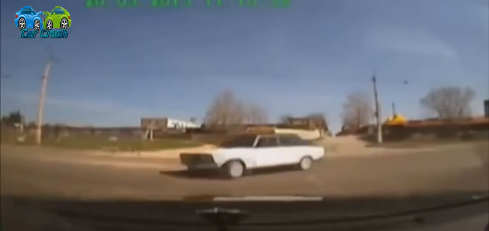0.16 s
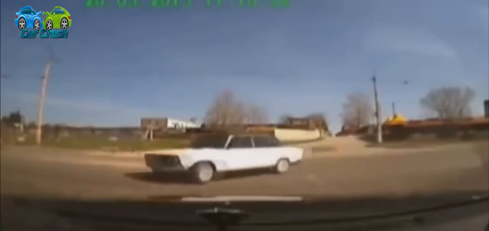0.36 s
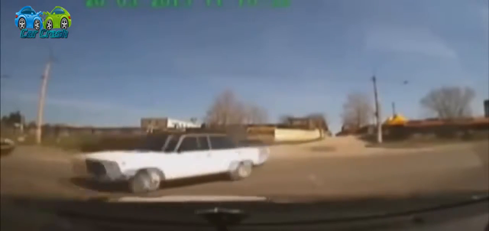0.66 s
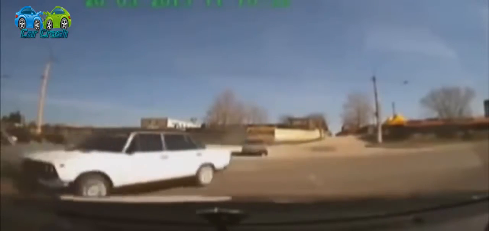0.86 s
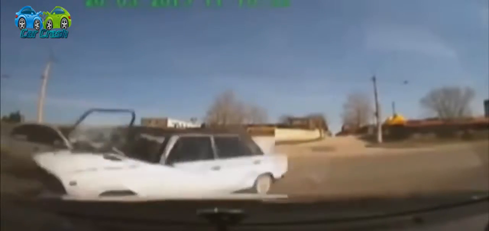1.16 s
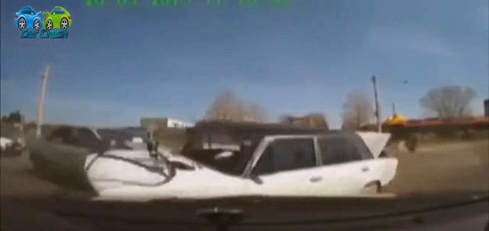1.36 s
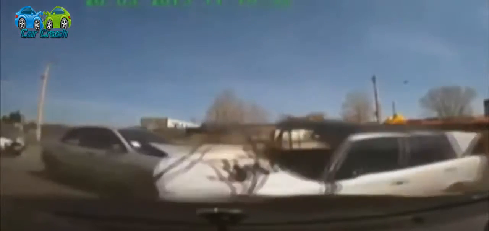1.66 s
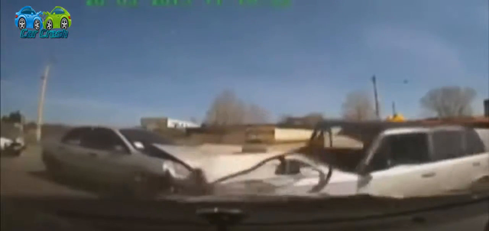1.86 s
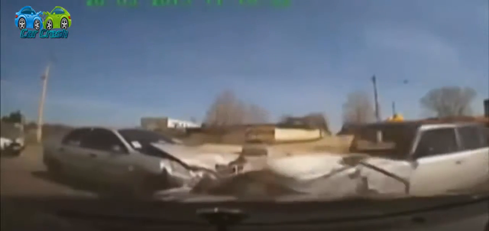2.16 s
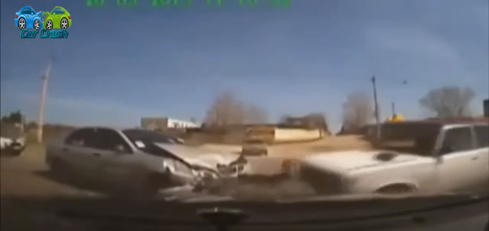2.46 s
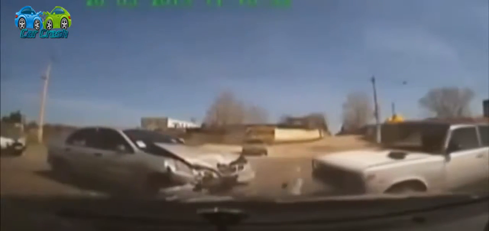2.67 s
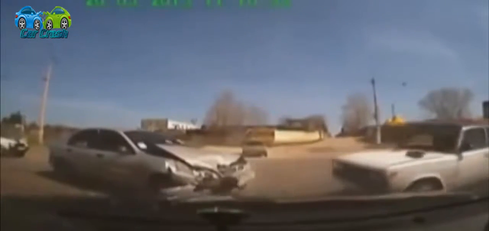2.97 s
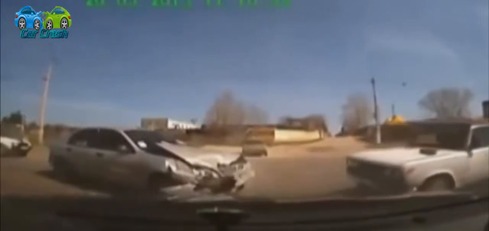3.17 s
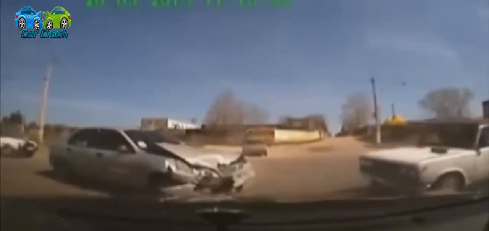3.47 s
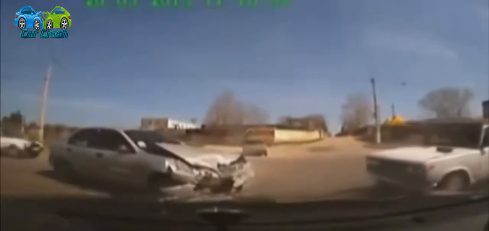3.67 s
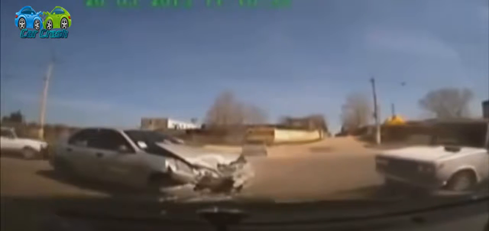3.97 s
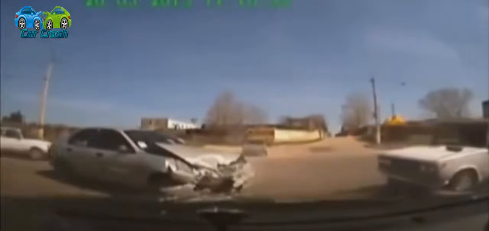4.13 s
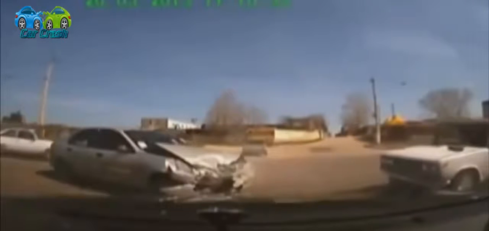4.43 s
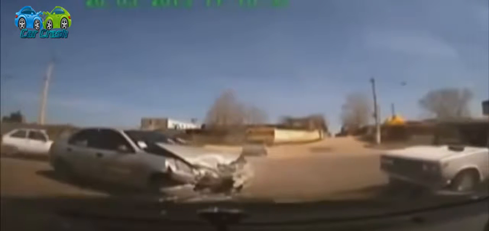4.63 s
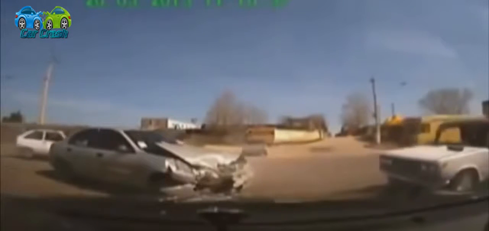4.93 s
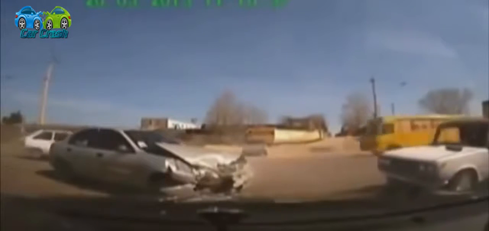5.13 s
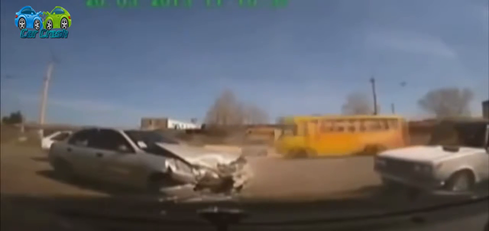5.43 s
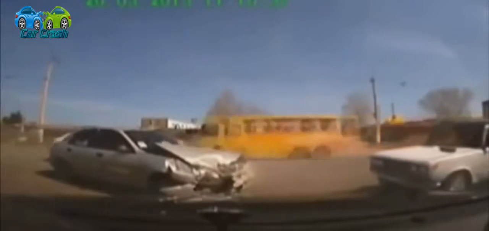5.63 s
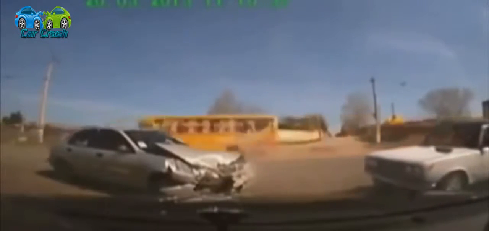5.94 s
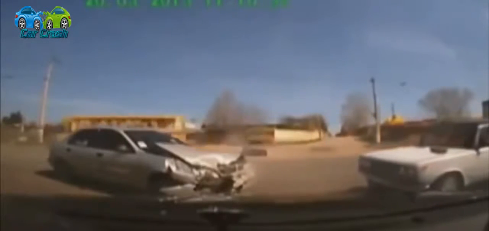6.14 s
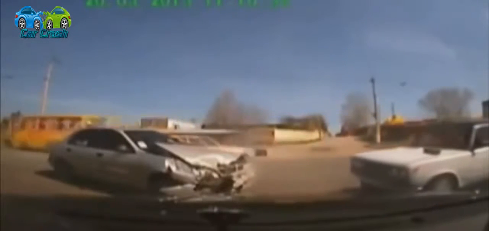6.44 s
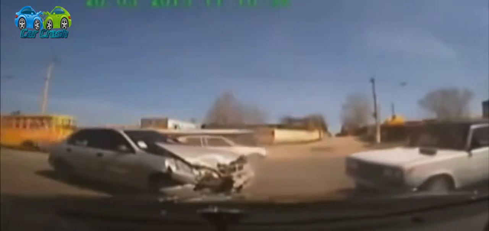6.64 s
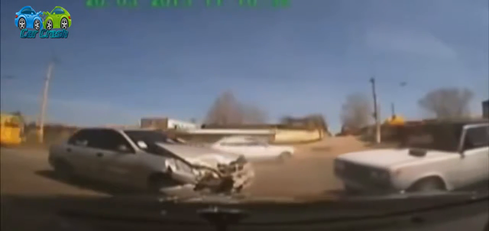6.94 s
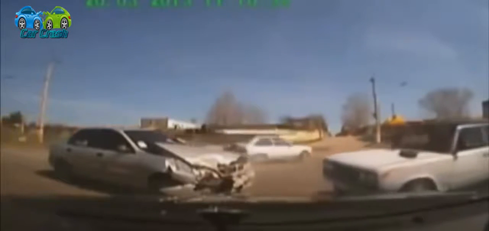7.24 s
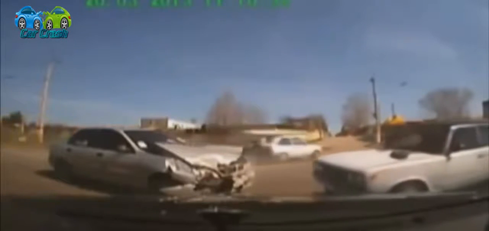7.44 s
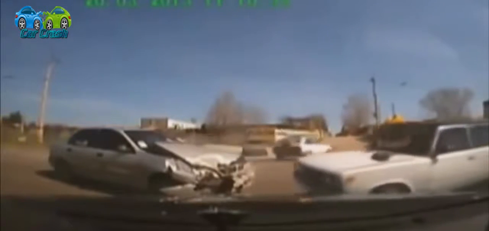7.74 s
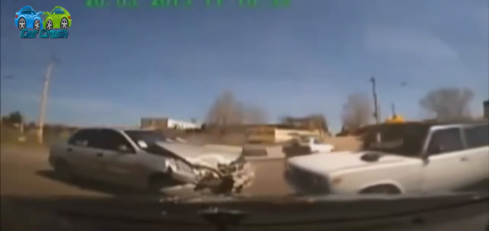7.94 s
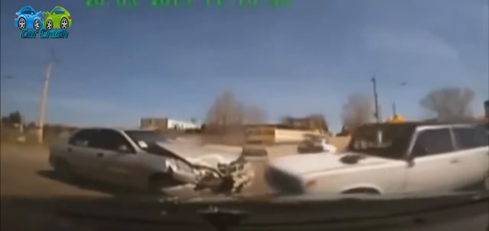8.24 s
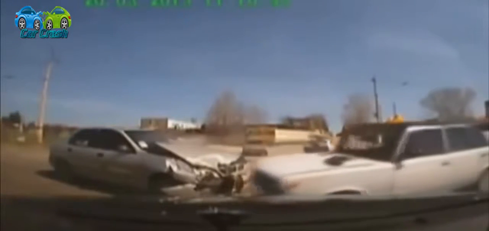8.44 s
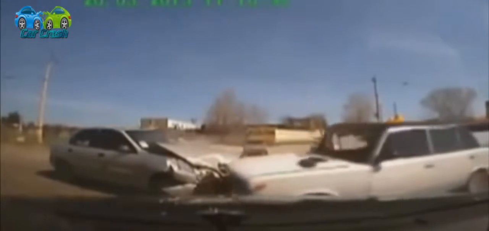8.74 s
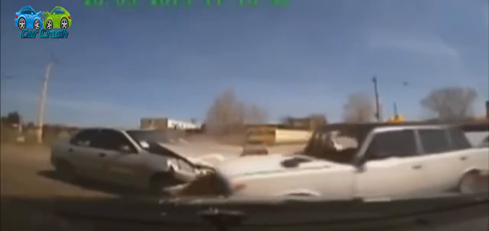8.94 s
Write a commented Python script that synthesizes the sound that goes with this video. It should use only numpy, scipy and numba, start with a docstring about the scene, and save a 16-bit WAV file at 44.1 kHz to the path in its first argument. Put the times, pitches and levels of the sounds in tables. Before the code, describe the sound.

Muffled in-car sound: rising engine, brief tyre screech, heavy metal crash with scraping and secondary thuds, then a rough rattling engine and wavering hum.

```python
"""An engine pulls away over road roar, tyres squeal and two cars collide and bounce at a crossing.
Blows and falling parts knock and snap, metal scrapes, then a damaged engine races on over a wandering low hum,
with short groans and a swelling drone. Engines and tones are stacked sines; road, panels and knocks are noise
shaped by spectra and resonances. The cheap microphone in the car is dull, sits off centre and overloads;
its sample clock wobbles."""
import sys
import numpy as np
from scipy import signal
from scipy.fft import rfft, irfft
from scipy.io import wavfile
from scipy.ndimage import uniform_filter1d
from numba import njit

SR = 44100
rng = np.random.default_rng(int(sys.argv[2]) if len(sys.argv) > 2 else 0)


def digitize_waveform(pressure):
    """Quantize a signal to 16-bit integers and store it at the path in sys.argv[1].

    Rows of a 2-D input are taken as channels; values are limited to [-1, 1].
    """
    field = np.atleast_2d(pressure).T
    bounded = np.clip(field, -1, 1)
    quanta = np.round(bounded * 32767).astype(np.int16)
    wavfile.write(sys.argv[1], SR, quanta)


N = 401310
TIME = np.arange(N) / SR


def undb(db):
    """Decibels to amplitude."""
    return 10 ** (np.asarray(db) / 20)


def unit(x):
    """Scale to rms 1."""
    return x / np.sqrt(np.mean(x ** 2))


def gate_between(start_s, end_s, fade_s):
    """1 from start to end, fading to 0 outside."""
    return np.clip(np.minimum(TIME - start_s, end_s - TIME) / fade_s + 1, 0, 1)


def read(table, fade_s=0.017):
    """A gate that closes outside the curve, then its columns at every sample."""
    s, *columns = np.transpose(table)
    return [gate_between(s[0], s[-1], fade_s)] + [np.interp(TIME, s, c) for c in columns]


@njit
def svf(x, hz, width):
    """State-variable band-pass with a moving centre, gain 1 there."""
    y, b, l = np.empty(len(x)), 0., 0.
    for i in range(len(x)):
        g, k = np.tan(np.pi * hz[i] / SR), width / hz[i]
        v = (b + g * (x[i] - l)) / (1 + g * (g + k))
        b, l, y[i] = 2 * v - b, l + 2 * g * v, k * v
    return y


def band(x, hz, width):
    """Band-pass with a fixed or moving centre."""
    return svf(x, hz + np.zeros(len(x)), 1. * width)


def double_band(x, hz, width, second_width):
    """Two band-passes in a row on one centre, for steeper skirts."""
    return band(band(x, hz, width), hz, second_width)


def walk(rate):
    """Random levels held 1 / rate s and slewed twice; spread near 1."""
    k = int(SR / rate)
    steps = np.repeat(rng.standard_normal(N // k + 1), k)
    return 1.261 * uniform_filter1d(uniform_filter1d(steps, k), k)[:N]


def colour(x, spectrum):
    """Shape x by (f/Hz, level/dB) points and scale to rms 1."""
    hz, db = np.transpose(spectrum)
    bins = np.arange(1, N // 2 + 2) * SR / N
    gain = undb(np.interp(np.log(bins), np.log(hz), db))
    return unit(irfft(rfft(x) * gain, N))


def tone(hz, multiple=1):
    """Sine of rms 1 on a moving pitch."""
    return np.sqrt(2) * np.sin(2 * np.pi * multiple * np.cumsum(hz) / SR)


def noisy_modes(modes, flutter_db):
    """Noise in each resonance, fluttering on its own."""
    out = 0
    for f, w, db in modes:
        ring = unit(double_band(rng.standard_normal(N), f, w, 2 * w))
        out = out + undb(db + flutter_db * walk(5)) * ring
    return out


def hum(phrases, flutter_db):
    """A near-pure tone that follows each phrase."""
    out = 0
    for phrase in phrases:
        gate, hz, db = read(phrase, fade_s=0.0085)
        out = out + gate * undb(db + flutter_db * walk(25)) * tone(hz)
    return out


def friction(curve, width_hz, waver, blur_db, overtone_db):
    """Stick-slip: a wavering tone that breaks up, blurred by noise in the same resonance and in its overtones."""
    gate, hz, db = read(curve)
    noise = rng.standard_normal(N)
    pitch = hz * (1 + waver * walk(60))
    cry = undb(0.8 * walk(70)) * tone(pitch)
    blur = double_band(noise, hz, width_hz, width_hz)
    overtones = sum(unit(band(noise, k * hz, k * width_hz)) + tone(pitch, multiple=k) for k in (2, 3))
    mix = unit(cry) + undb(blur_db) * unit(blur) + undb(overtone_db) * unit(overtones)
    return gate * undb(db) * unit(mix)


# resonances the higher orders climb through: (f/Hz, width/Hz, gain as level/dB)
PULL_RESONANCES = [(405, 100, -48), (541, 47, -49), (850, 99, -46.5)]
PULL_START_HZ, PULL_CLIMB_HZ_PER_S = 61.95, 35  # firing rate
PULL_LIFT_S = 1.2  # the driver lifts off
FIRST_OVER_SECOND_DB = -1
SECOND_START_DB, SECOND_GAIN_DB_PER_S = -58.5, 19.5  # second order grows with the revs
# third order grows, then drops away
THIRD_START_DB, THIRD_GAIN_DB_PER_S, THIRD_ENDS_S, THIRD_LATE_DB = -50, 9.5, 0.79, -50.5


def pulling_engine():
    """Three strong low orders of the firing rate, and higher ones that flutter and light up in the resonances."""
    hz = PULL_START_HZ + PULL_CLIMB_HZ_PER_S * np.minimum(TIME, PULL_LIFT_S + .2)
    second_db = SECOND_START_DB + SECOND_GAIN_DB_PER_S * np.minimum(TIME, PULL_LIFT_S)
    third_db = np.where(TIME < THIRD_ENDS_S, THIRD_START_DB + THIRD_GAIN_DB_PER_S * TIME, THIRD_LATE_DB)
    first = undb(FIRST_OVER_SECOND_DB + 2.0 * walk(5.7)) * tone(hz)
    low = undb(second_db) * (tone(hz, multiple=2) + first)
    third = uniform_filter1d(undb(third_db), size=2000) * tone(hz, multiple=3)
    stack = sum(undb(4.8 * walk(5.8)) * tone(hz, multiple=k) for k in range(4, 11))
    upper = sum(undb(db) * double_band(stack, f, w, 2 * w) for f, w, db in PULL_RESONANCES)
    upper = np.minimum(TIME / 0.93, 1) * upper  # fades in
    return gate_between(0, PULL_LIFT_S, fade_s=0.096) * (low + third + upper)


# swell of road and traffic: (t/s, gain as level/dB)
TRAFFIC_SWELL = [(0, -47), (1.04, -41), (1.9, -42.5), (2.3, -28), (3.4, -37.5), (9.1, -39.5)]
# tyre roar spectrum: (f/Hz, relative level/dB per Hz)
ROAR_SPECTRUM = [(120, -16.5), (250, -10.5), (400, -13.5), (600, -14.5), (1000, -13.5), (1200, -9.5),
                 (2000, -18.5), (4060, -32.5), (6000, -52)]
# cabin modes the road excites: (f/Hz, width/Hz, level/dB over the traffic swell)
CABIN_MODES = [(235, 33, -14), (511.5, 18.5, -8.5), (810, 55, -7.5)]
# the own car shakes at idle: (f/Hz, width/Hz, level/dB)
IDLE_MODES = [(27, 12.7, -42.5), (70.4, 67, -48.5), (138, 27.5, -41.5)]
HISS_DB = -72  # self noise of the microphone


def road():
    """Tyre roar and cabin modes swell with the traffic, over idle shake and hiss: all shaped noise."""
    swell_db = read(TRAFFIC_SWELL)[1]
    roar = undb(5 + 0.25 * walk(6.9)) * colour(rng.standard_normal(N), ROAR_SPECTRUM)
    cabin = undb(swell_db) * (roar + noisy_modes(CABIN_MODES, flutter_db=3.5))
    hiss = undb(HISS_DB) * rng.standard_normal(N)
    return cabin + noisy_modes(IDLE_MODES, flutter_db=2.0) + hiss


# steady hum before the crash: (t/s, f/Hz, level/dB)
HUM_BEFORE = [(1.55, 145, -38), (2.36, 140.7, -49)]
# the hum surges and sags afterwards: (t/s, f/Hz, level/dB)
HUM_SURGE = [(3.36, 98.6, -39), (3.42, 112.9, -24.5), (3.66, 167.2, -24.5), (3.85, 159.5, -35),
             (4.13, 136.3, -29), (4.36, 149.4, -22), (4.55, 142.1, -32), (4.62, 173.3, -31),
             (5.06, 142.4, -23), (5.27, 148.5, -20), (5.51, 163.3, -27), (5.78, 125, -40),
             (6.06, 139.7, -35), (6.15, 122.4, -25), (6.31, 151, -26), (6.6, 129, -37), (6.741, 113.6, -32),
             (6.95, 139.7, -28.5), (7.549, 116.7, -45.5), (7.671, 122.2, -35.5), (8.48, 147.9, -26),
             (8.682, 153, -35.5), (8.999, 158, -43)]


def low_hum():
    """A near-pure sine, steady at first, then wandering in pitch and level."""
    return hum([HUM_BEFORE, HUM_SURGE], flutter_db=0.06)


# first sliding tyre: (t/s, f/Hz, level/dB)
TYRE_LOW = [(1.9, 731, -41), (1.99, 688, -15.5), (2.12, 689, -16), (2.28, 747, -20.5), (2.37, 739, -13.5),
            (2.41, 740, -23)]
# second sliding tyre: (t/s, f/Hz, level/dB)
TYRE_HIGH = [(1.92, 802, -41), (1.956, 770, -30.5), (2.334, 794, -13), (2.41, 798, -32)]


def squealing_tyres():
    """Rubber sticks and slips: one tyre cries a clear note, the other is mostly noise around its pitch."""
    low = friction(TYRE_LOW, width_hz=110, waver=.025, blur_db=-3, overtone_db=-8)
    return low + friction(TYRE_HIGH, width_hz=220, waver=0.02, blur_db=33, overtone_db=-16)


def blow(s, push_s, db, t60_s):
    """Quick rise, hold while the bodies push, then ring out."""
    rise = np.clip((TIME - s) / 0.009, 0, 1)
    return rise * undb(db - 60 * np.maximum(TIME - s - push_s, 0) / t60_s)


# bodies hit each other and the road: (t/s, push length/s, crunch level/dB before SHEET_GAIN_DB, thud gain as level/dB)
IMPACTS = [(2.384, 0.12, -14, -19), (2.523, 0.053, -32, -32), (3.162, 0.025, -28, -24.5),
           (3.284, 0.055, -25, -32), (3.421, 0.026, -44, -28), (3.744, 0.039, -28, -26.5),
           (3.914, 0.036, -48, -29), (4.047, 0.026, -16.5, -16), (4.09, 0.056, -37.5, -25),
           (4.625, 0.049, -35.5, -36)]
# sheet metal spectrum: (f/Hz, relative level/dB per Hz)
SHEET_SPECTRUM = [(88, -17.5), (150, 7.5), (200, -24), (253, -18), (334, -9), (723, 0.5), (786, -0.5),
                  (1140, 0.5), (2200, -1.5), (2900, -10), (4060, -11.5), (5280, -71)]
# low modes of the car bodies: (f/Hz, width/Hz, level/dB over the thud)
BODY_MODES = [(29.8, 29, -2.5), (126.4, 77, 0.5), (364, 200, -3)]
CRUNCH_T60_S, THUD_T60_S = 0.19, 0.36
SHEET_GAIN_DB = 6  # lifts blows and grind alike
# metal grinds between the blows: it builds to a peak, then dies down and stops
GRIND_BEGINS_S, GRIND_PEAK_S, GRIND_ENDS_S = 1.997, 2.23, 6.8
GRIND_BUILD_DB_PER_S, GRIND_PEAK_DB, GRIND_FADE_DB_PER_S = 40, -23.5, 8  # peak before SHEET_GAIN_DB
# the bodies rock from the first blow on; the level falls along a line through this value at the grind peak
SHUDDER_DB, SHUDDER_FADE_DB_PER_S, SHUDDER_ENDS_S = -28, 4, 4.1


def crush():
    """Dense cracks of every size in the panels, and the low shudder of the bodies."""
    after = TIME - GRIND_PEAK_S
    grind_db = GRIND_PEAK_DB + np.minimum(GRIND_BUILD_DB_PER_S * after, -GRIND_FADE_DB_PER_S * after)
    crunch = gate_between(GRIND_BEGINS_S, GRIND_ENDS_S, fade_s=0.15) * undb(grind_db)
    shudder_gate = (TIME > IMPACTS[0][0]) * gate_between(0, SHUDDER_ENDS_S, fade_s=0.066)
    thud = shudder_gate * undb(SHUDDER_DB - SHUDDER_FADE_DB_PER_S * after)
    # the blows sum, and the louder of blows and background wins
    crunch = np.maximum(crunch, sum(blow(s, push_s, db, CRUNCH_T60_S) for s, push_s, db, _ in IMPACTS))
    thud = np.maximum(thud, sum(blow(s, push_s, db, THUD_T60_S) for s, push_s, _, db in IMPACTS))
    crack_db = 2.4 * np.minimum(rng.exponential(size=N // 256 + 1), 2.5)  # a new size every 256 samples
    cracks = rng.standard_normal(N) * undb(np.repeat(crack_db, 256)[:N])
    sheet = colour(cracks, SHEET_SPECTRUM)
    # each panel rings up and chokes on its own
    panels = 600 * 1.35 ** np.arange(7)
    sheet = sheet + sum((undb(2.2 * walk(60)) - 1) * band(sheet, f, f / 3) for f in panels)
    thumps = undb(3.3 * walk(30)) * noisy_modes(BODY_MODES, flutter_db=-2.5)
    return undb(SHEET_GAIN_DB) * crunch * unit(sheet) + thud * thumps


# short knocks and snaps, from blows, falling parts and a high scrape chirp:
# (t/s, level/dB before a 7 dB cut, centre f/Hz, snap level/dB before a 1 dB lift)
SHORT_HITS = [(2.437, 1, 1160, -18), (2.738, -7, 1190, -21), (2.784, -12, 1570, -23),
              (2.862, -14, 4000, -20), (2.898, -20, 2500, -2), (3.07, -35, 2480, -6), (3.169, -15, 1900, 2),
              (3.238, -15, 2270, -13), (3.247, -12, 1360, 3), (3.326, -6.5, 1820, -5),
              (3.377, -22, 2400, 7.5), (3.485, -18, 1550, -10), (3.723, -15.5, 1250, -22),
              (3.77, -23, 725, -21), (3.825, -21, 1340, 3), (3.965, -19, 1820, -12),
              (4.053, -11.5, 1090, -16), (4.198, -18, 2020, -14), (4.524, -10, 1000, -27),
              (4.61, -12.5, 1447, -26), (4.662, -15, 1230, 5.5), (8.65, -10.5, 1330, -30)]


def knocks_and_snaps(hold_s=.014, size=4096):
    """Each hit is a noisy knock around its centre that holds longer the louder it is, and a short bright snap."""
    out, t = np.zeros(N + size), np.arange(size) / SR
    for s, db, hz, bright_db in SHORT_HITS:
        noise = rng.standard_normal(size)
        hold = hold_s * undb(0.32 * (db + 20.5))
        knock = unit(double_band(noise, hz, .6 * hz, 1.2 * hz)) * np.exp(-(t / hold) ** 2)
        snap = unit(double_band(noise, 3600, 1300, 2000)) * np.exp(-t / .004)
        hit = np.minimum(t / 0.00073, 1) * (knock + undb(bright_db + 1) * snap)
        i = int(s * SR)
        out[i:i + size] += undb(db - 7.0) * hit
    return out[:N]


# scraping metal edge: (t/s, f/Hz, level/dB before its flutter)
SCRAPING_EDGE = [(2.55, 1130, -25), (2.66, 1096, -18.5), (2.79, 1200, -32.5), (2.822, 1390, -19.5),
                 (2.871, 1340, -13), (2.92, 1400, -22), (2.955, 1540, -17), (3.001, 1385, -25),
                 (3.15, 1413, -24), (3.17, 1850, -35), (3.195, 1900, -17.5), (3.22, 1940, -36)]
SECOND_EDGE_RATIO, SECOND_EDGE_DB = 1.2, -6  # pitch and level against the first edge


def scraping():
    """Two torn edges drag over the road, catching and slipping; the second is higher, coarser and ends sooner."""
    upper = [(s, SECOND_EDGE_RATIO * hz, db + SECOND_EDGE_DB) for s, hz, db in SCRAPING_EDGE[:-3]]
    first = friction(SCRAPING_EDGE, width_hz=320, waver=0.0295, blur_db=0.5, overtone_db=-20)
    second = friction(upper, width_hz=430, waver=0.11, blur_db=19, overtone_db=-6)
    return undb(2.0 * walk(35)) * first + undb(1.9 * walk(30.3)) * second


# damaged engine: (t/s, firing rate f/Hz, clatter level/dB)
RACING_REVS = [(3.08, 70.4, -46), (3.18, 75.3, -28), (3.43, 82.26, -36.5), (4.4, 87.3, -26.5),
               (4.94, 89.13, -24.5), (6.06, 89.7, -25.5), (7.26, 91.94, -23.5), (8.78, 94.1, -27),
               (9.05, 93.6, -27)]
# engine block and bonnet: (f/Hz, width/Hz, relative level/dB)
BLOCK_MODES = [(524, 65, -7), (766, 59, 0.5), (1112, 51, 4), (1345, 113, 0.5), (1730, 663, 2.5),
               (1993, 123, 6), (2038, 54, 8.5), (2680, 140, -26), (3015, 160, -7.5), (3520, 73, -4)]
# moments the order levels belong to: (t/s)
ORDER_TIMES = [3.2, 4.9, 6.2, 7.4, 9.0]
# orders that stand out: (multiple of the firing rate, then level/dB at each moment)
LOUD_ORDERS = [(2, -37, -28.5, -32, -31.5, -27), (3, -61, -42.5, -57, -52, -35),
               (4, -30, -42, -40.5, -40, -46), (5, -59, -66, -63, -43, -46), (6, -52, -56, -44.5, -41, -41),
               (9, -57, -42, -44, -58, -40.5)]
# whine of a gear: (t/s, level/dB)
GEAR_WHINE = [(4.1, -36), (4.55, -40), (4.72, -27), (5.02, -28), (5.2, -33), (6.3, -39), (7.4, -28.5),
              (9.0, -45.5)]
GEAR_TEETH = 21


def racing_engine(throb=0.78):
    """Orders and weaker half orders ring the block; loose parts rattle; a few orders and a gear stand out."""
    gate, hz, clatter_db = read(RACING_REVS, fade_s=0.04)
    turn = 2 * np.pi * np.cumsum(hz * (1 + 0.001577 * walk(20))) / SR
    starts = 2 * np.pi * rng.random(100)
    whole = sum(undb(3.2 * walk(8)) * np.sin(k * turn + starts[k]) for k in range(5, 44))
    halves = sum(np.sin((k + .5) * turn + starts[50 + k]) for k in range(5, 30))
    rattle = rng.standard_normal(N) * (1 + throb * np.sin(turn))
    drive = unit(whole) + undb(-12) * unit(halves) + undb(4) * rattle
    block = 0
    for k, (f, w, db) in enumerate(BLOCK_MODES):
        # neighbouring modes have opposite sign
        block = block + (-1) ** k * undb(db + walk(3.12)) * double_band(drive, f, w, 4 * w)
    rough_db = np.interp(TIME, [4.2, 4.8], [4.5, 1])  # rougher at first, steadier after 4.8 s
    orders = 0
    for k, *db in LOUD_ORDERS:
        order_db = np.interp(TIME, ORDER_TIMES, db) + 1.34 * walk(3.91) + rough_db * walk(18)
        orders = orders + undb(order_db) * np.sqrt(2) * np.sin(k * turn)
    whine_gate, whine_db = read(GEAR_WHINE, fade_s=0.26)
    whine = whine_gate * undb(whine_db + 1.8 * walk(14)) * np.sqrt(2) * np.sin(GEAR_TEETH * turn)
    return gate * (undb(clatter_db) * unit(block) + orders + whine)


# short falling groans near 400 Hz, then drone swells near 250 Hz:
# (start t/s, length/s, start f/Hz, end f/Hz, middle level/dB)
GROANS_THEN_DRONE = [(3.15, 0.1, 387, 352, -31), (3.245, 0.086, 429, 396, -25), (3.6, 0.14, 242, 254, -31),
                     (4.24, 0.19, 245, 253.9, -31.5), (4.6, 0.22, 258, 234.5, -30),
                     (5.1, .2, 247.5, 255, -35), (5.36, .22, 231.2, 242, -33),
                     (6.13, 0.14, 252, 245.3, -35.5), (7.2, .16, 250.3, 246, -33.5),
                     (7.64, 0.28, 245, 257, -34.5)]
SWELL_EDGE_DB = -4  # how far under its middle each swell begins and ends


def groans_and_drone():
    """A near-pure sine in gliding swells, each loudest in its middle: two falling groans, then a drone."""
    glides = []
    for s, length, hz, end_hz, db in GROANS_THEN_DRONE:
        edge_db = db + SWELL_EDGE_DB
        middle = (s + length / 2, (hz + end_hz) / 2, db)
        glides.append([(s, hz, edge_db), middle, (s + length, end_hz, edge_db)])
    return hum(glides, flutter_db=1.0)


def scene():
    """Sum of all sources, as one channel."""
    engines = pulling_engine() + racing_engine()
    tones = low_hum() + groans_and_drone()
    crash = squealing_tyres() + crush() + knocks_and_snaps() + scraping()
    return (engines + road() + tones + crash)[None]


# clock wobble: (f/Hz, peak level/dB of one sample)
CLOCK_WOBBLE = [(3917.8, -16), (7794.8, -20), (11712.6, -28), (15589.3, -33)]
JITTER_DB = -11  # random part of the wobble, before smoothing over 5 samples
OFFSET, HEADROOM_UP, HEADROOM_DOWN = -.337, 0.44, 0.22  # full scale = 1
KNEE_UP, KNEE_DOWN = 1.35, 2  # higher is harder
TOP_HZ = 15050


def record(dry):
    """Dull capsule, lopsided overload, a wobbling clock that mirrors the sound into the treble, steep top."""
    x = signal.sosfilt(signal.butter(2, 4200, fs=SR, output="sos"), dry)
    room = np.where(x > 0, HEADROOM_UP, HEADROOM_DOWN)
    knee = np.where(x > 0, KNEE_UP, KNEE_DOWN)
    x = x / (1 + np.abs(x / room) ** knee) ** (1 / knee)
    x = signal.sosfilt(signal.butter(2, 3900, fs=SR, output="sos"), x)
    # a timing error moves each sample by slope times error
    wobble = sum(undb(db) * np.cos(2 * np.pi * hz * TIME) for hz, db in CLOCK_WOBBLE)
    wobble = wobble + undb(JITTER_DB) * uniform_filter1d(rng.standard_normal(N), size=5)
    x = x + wobble * np.gradient(x, axis=1)
    return OFFSET + signal.sosfilt(signal.ellip(12, .2, 90, TOP_HZ, fs=SR, output="sos"), x)


dry = scene()
out = record(dry)
digitize_waveform(out)
```